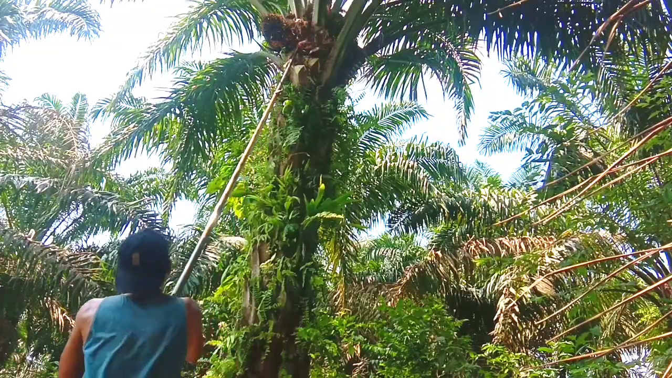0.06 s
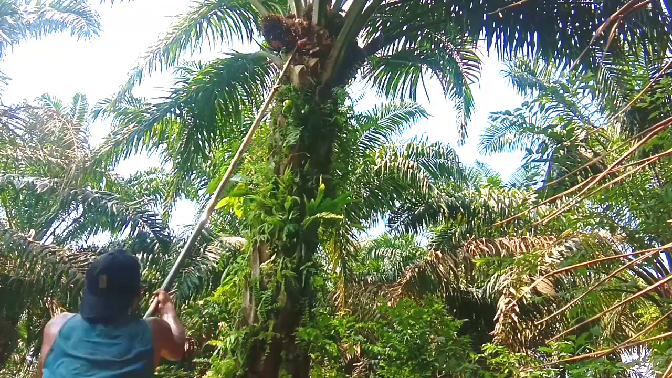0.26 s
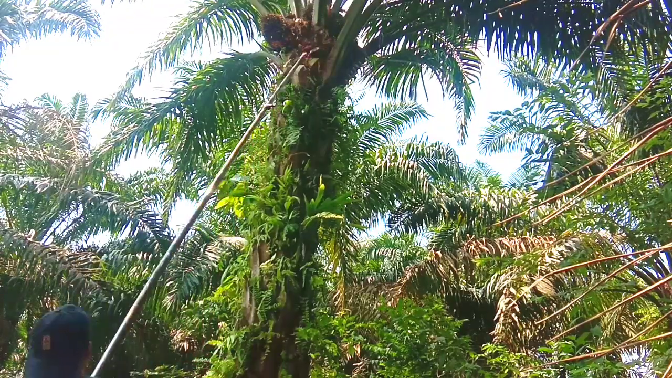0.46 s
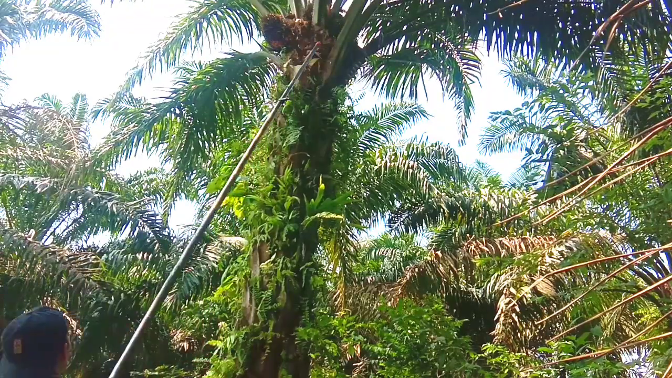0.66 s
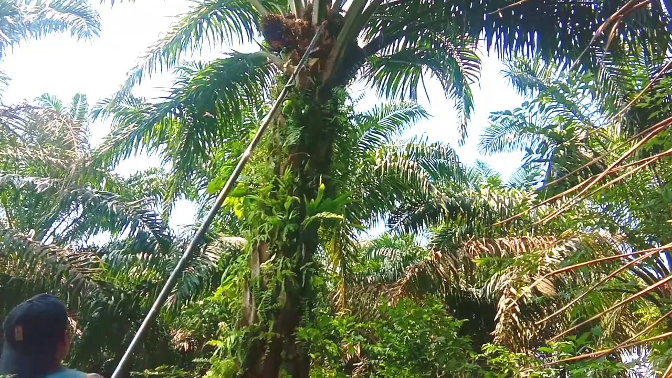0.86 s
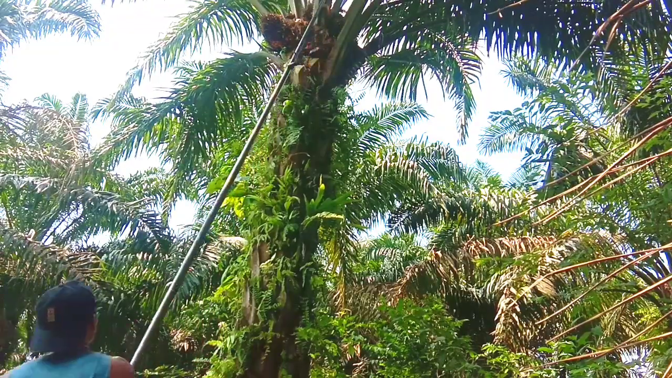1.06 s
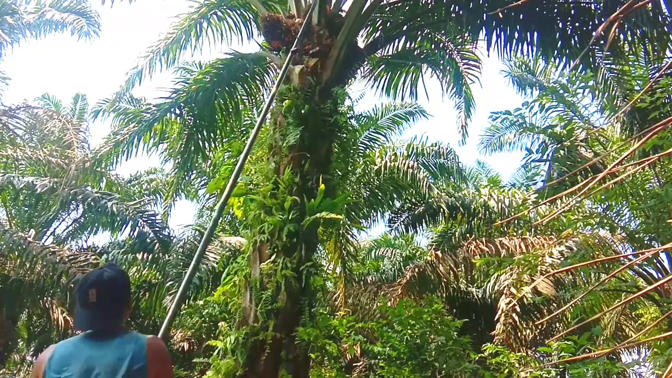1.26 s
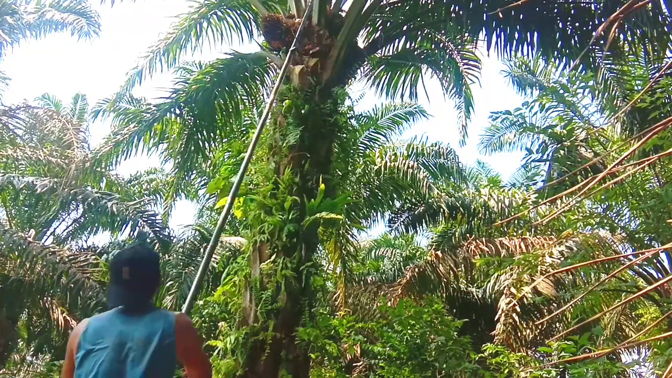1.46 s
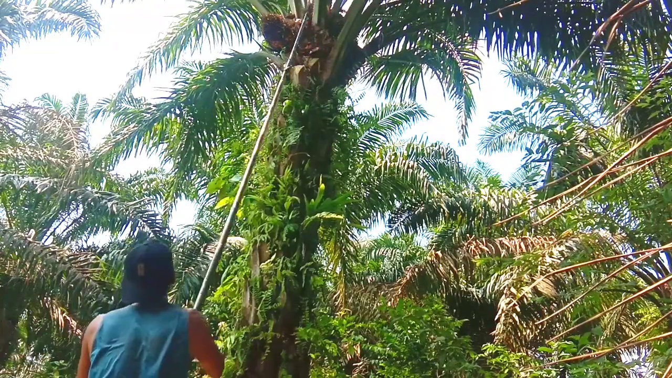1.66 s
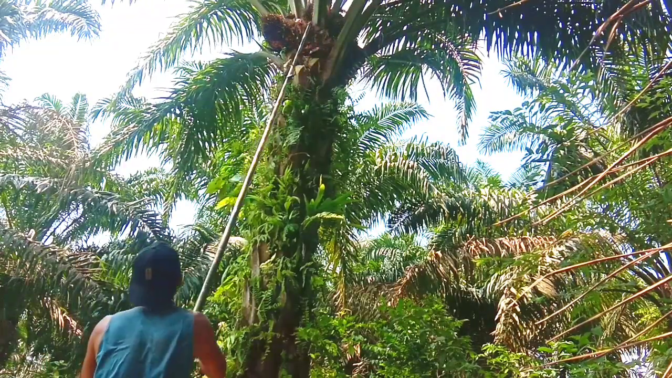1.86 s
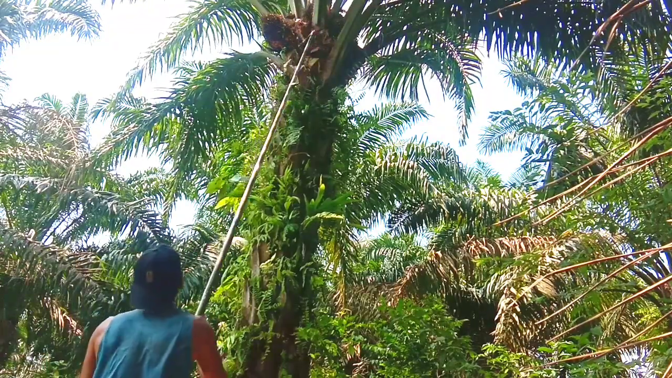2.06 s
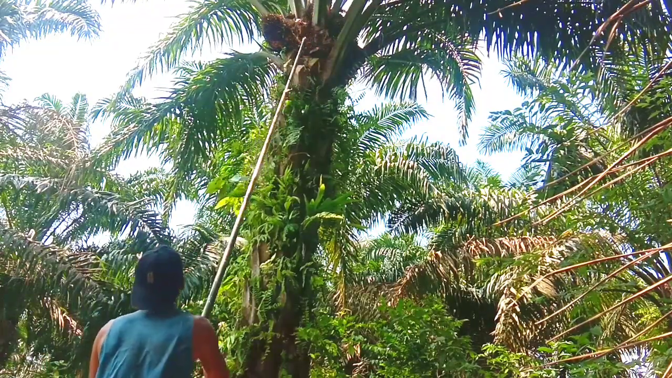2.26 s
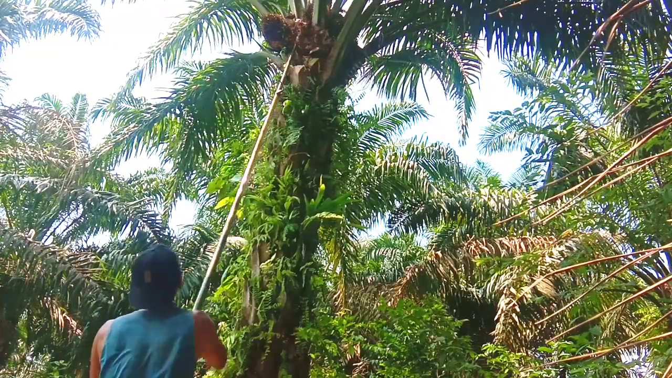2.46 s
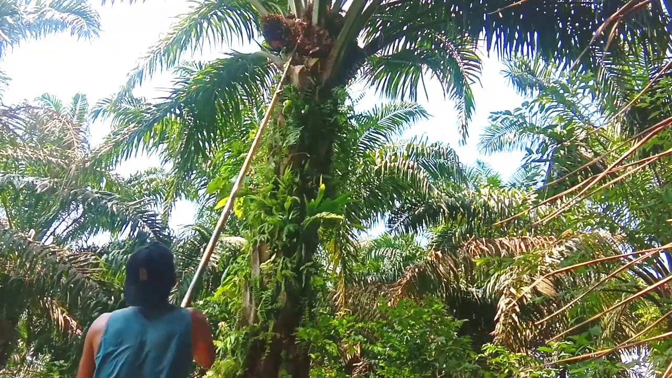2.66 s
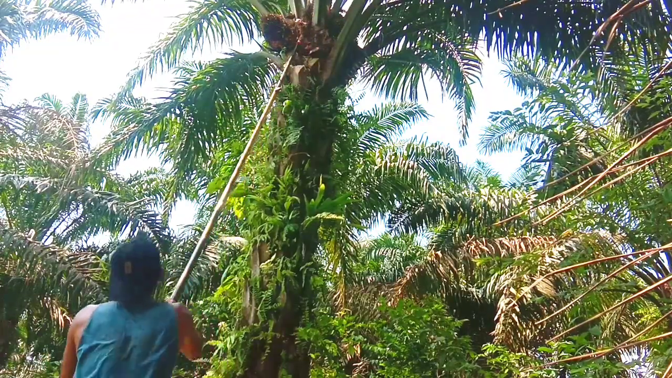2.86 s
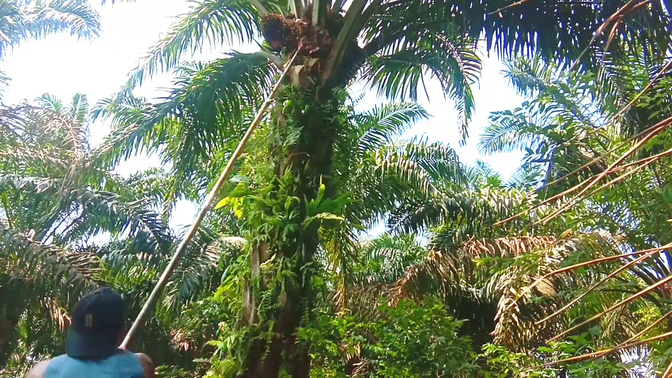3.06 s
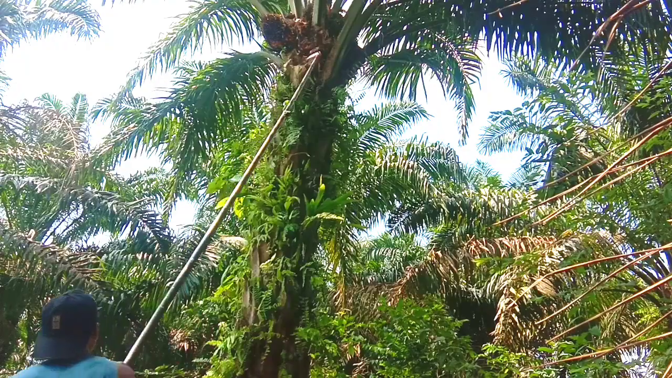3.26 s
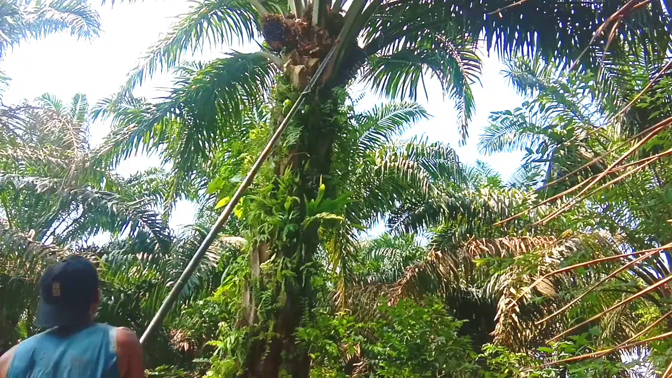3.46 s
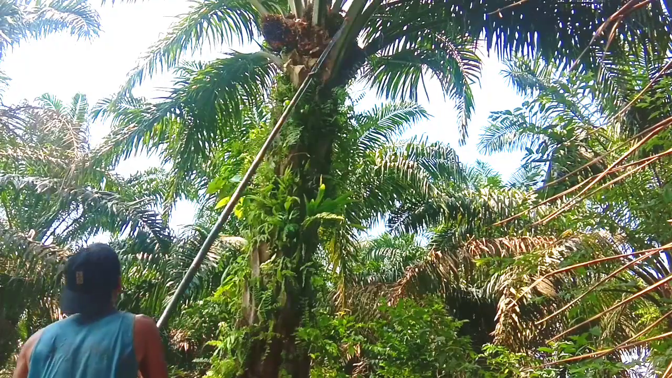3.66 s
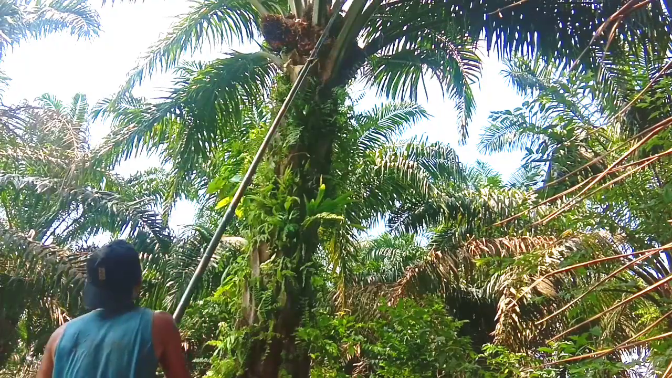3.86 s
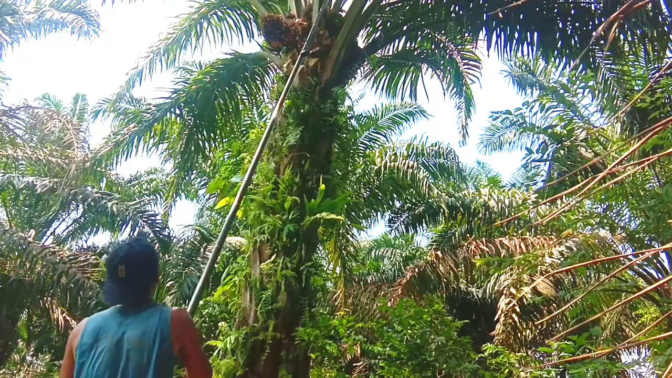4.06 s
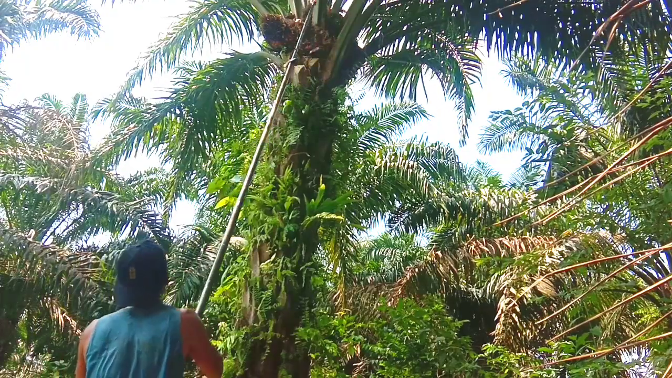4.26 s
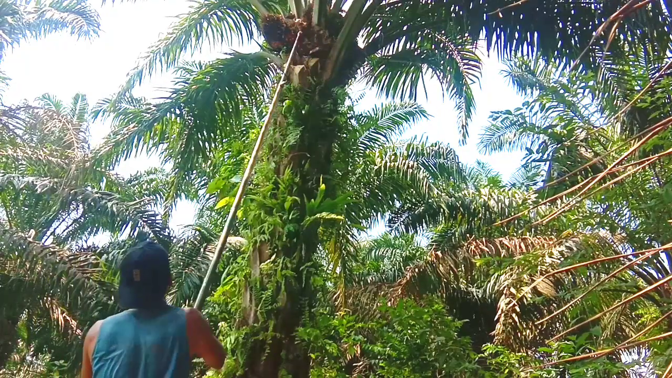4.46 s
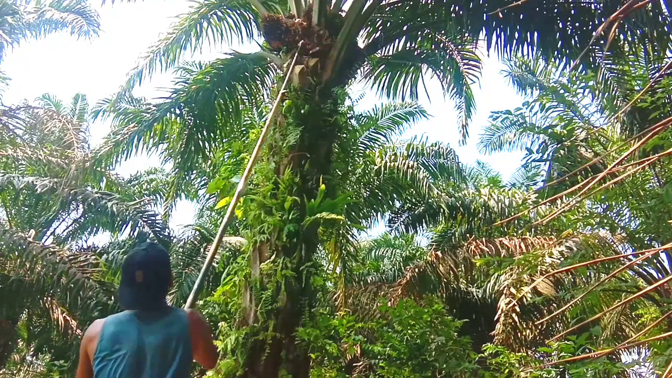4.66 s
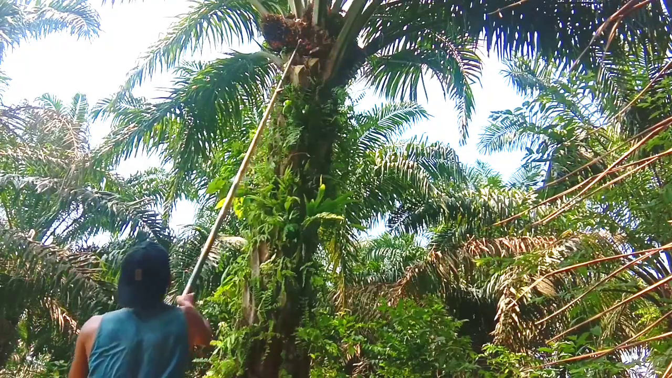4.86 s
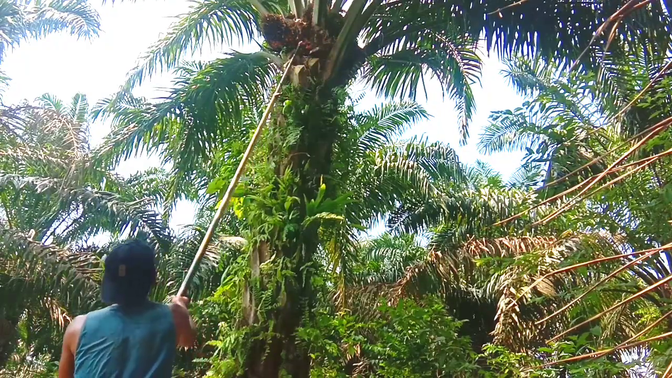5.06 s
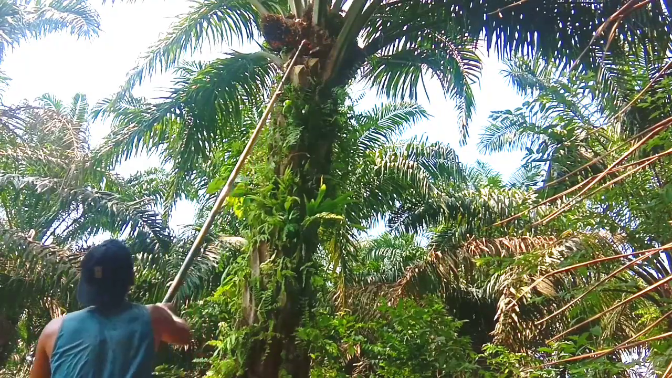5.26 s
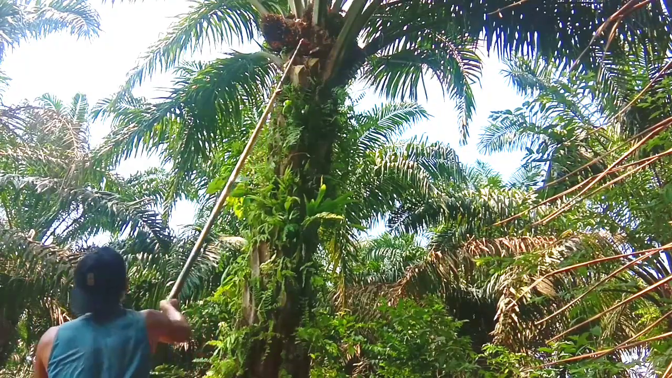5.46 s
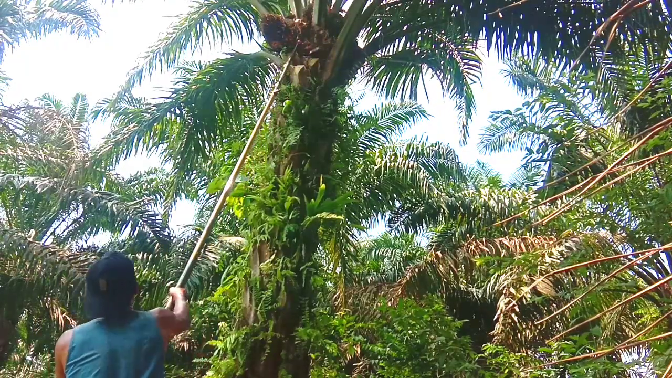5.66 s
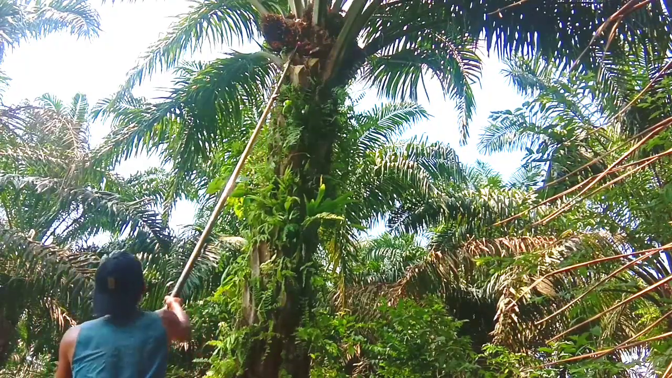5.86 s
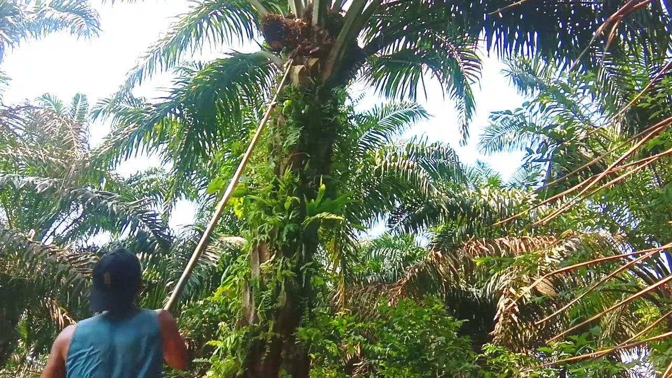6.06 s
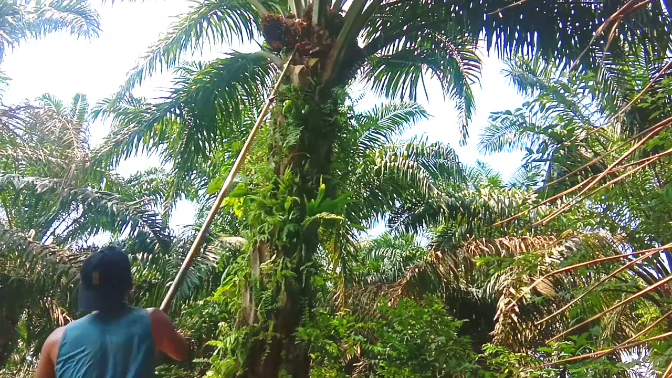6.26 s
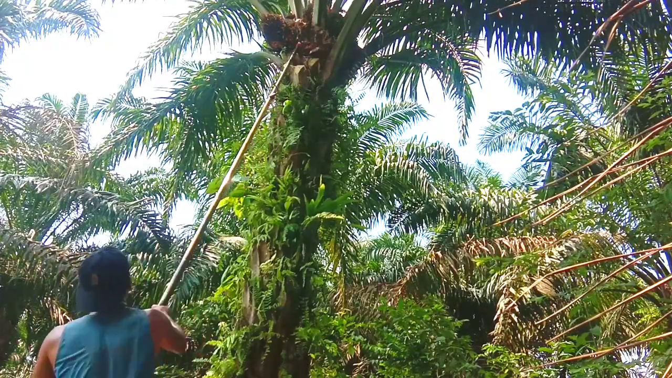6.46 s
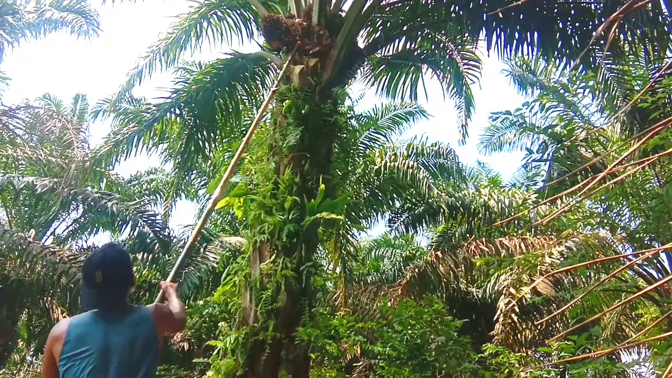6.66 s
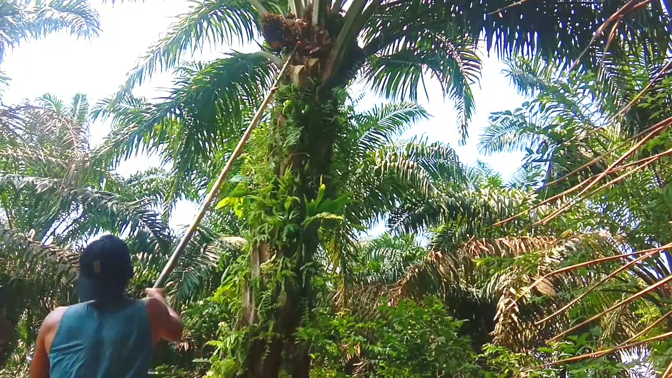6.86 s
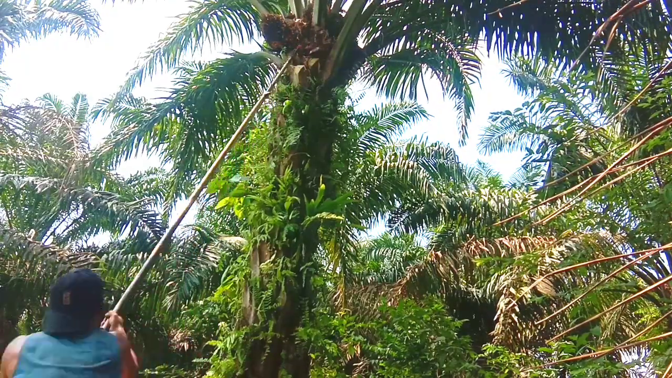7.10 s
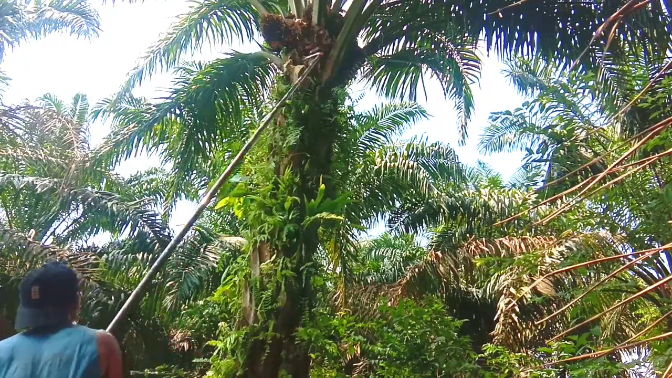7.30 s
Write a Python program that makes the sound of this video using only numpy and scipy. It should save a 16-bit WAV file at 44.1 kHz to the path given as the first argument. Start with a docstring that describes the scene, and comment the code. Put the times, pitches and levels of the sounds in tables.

```python
"""A sickle on a long hollow metal pole saws and scrapes at a palm's fruit stalk: stick and slip snaps fibres
in clumps and keeps pole and blade droning. Knocks excite the damped modes of the blade and shake dry fronds;
each jolt travels the pole as dispersive bending waves, a falling thump with echoes. Dry leaflets rustle in
ticks; far insects whine as clicks through narrow resonances, one nearer insect chirps three times; filtered
noise makes the quiet air. The sound is almost mono: only part of the air differs between the channels."""
import sys
import numpy as np
from scipy import signal
from scipy.fft import rfft, irfft, next_fast_len
from scipy.io import wavfile
from scipy.ndimage import uniform_filter1d

SR = 44100
rng = np.random.default_rng(int(sys.argv[2]) if len(sys.argv) > 2 else 0)


def bounce(signal):
    """Save signal as a 16-bit WAV file at the path given by the first command-line argument."""
    frames = np.transpose(np.atleast_2d(signal))
    limited = np.clip(frames, -1, 1)
    pcm = np.round(limited * 32767).astype(np.int16)
    wavfile.write(sys.argv[1], SR, pcm)


N = 323253

# Murmur of the air, spectral shape: [f/Hz, relative level/dB per Hz]
AIR_SPECTRUM = [(15, -31), (25, -22), (43, -6), (122, 5.5), (221, -3), (429, -4.5), (493, -8), (936, -13.5),
                (3090, -16.5), (6000, -23), (7800, -45), (13200, -120)]
# Air that differs between the channels, spectral shape: [f/Hz, relative level/dB per Hz]
WIDE_SPECTRUM = [(15, -40), (25, -8), (136, -3.5), (4380, -12.5), (6050, -15), (6550, -43), (8580, -54),
                 (9550, -30), (11500, -24), (15500, -26)]
AIR_DB, HISS_DB, WIDE_DB = -52, -53.5, -60
# Resonances of the insect chorus: [f/Hz, width/Hz, relative level/dB]
INSECT_BANDS = [(6765, 220, -8), (7167, 390, 0.5), (7366, 164, -2), (7730, 130, -9), (8390, 390, -6),
                (9190, 870, -10)]
# Course of the chorus: [t/s, level/dB]
CHORUS_LEVEL = [(0, -38.5), (.4, -38.5), (.8, -42), (1.16, -43), (1.43, -41), (3.1, -40.5), (3.5, -43),
                (4.7, -41.5), (6.04, -38), (6.35, -39.5), (7.33, -38)]
# Chirps of one nearer insect: [t/s, peak level/dB, f/Hz]
NEAR_CHIRPS = [(0.237, -25.5, 8460), (0.265, -34, 8330), (0.279, -29.5, 8340)]
# Dry fronds stirred by the pole, course: [t/s, level/dB]
RUSTLE_LEVEL = [(0, -49), (.2, -50), (.3, -43.5), (.8, -41), (.92, -66), (1.0, -46), (1.08, -71),
                (1.18, -52), (1.27, -40.5), (1.52, -40), (1.7, -47.5), (2.0, -47), (2.4, -45),
                (2.76, -44.5), (2.9, -50), (3.45, -48), (3.62, -77), (3.72, -47), (3.87, -45.5),
                (4.05, -46.5), (4.3, -57.5), (4.43, -47), (4.93, -56), (5.05, -40), (5.14, -50),
                (5.35, -47), (5.43, -52), (5.58, -45.5), (5.87, -52), (6.22, -41.5), (6.38, -69),
                (6.68, -46), (6.8, -59), (7.02, -47.5), (7.33, -48)]
# Dry leaflets, spectral shape: [f/Hz, relative level/dB per Hz]
LEAF_SPECTRUM = [(500, -4), (900, -6.5), (2000, -7.5), (4000, -4.5), (6000, -4.5), (8000, 4), (10000, -6.5),
                 (13000, -12), (16000, -5.5)]
# Jolts down the pole: [t/s, peak level/dB, strongest f/Hz, path along the pole/m]
JOLTS = [(.429, -18, 824, 27), (.444, -11, 400, 9), (0.521, -12, 277, 9), (0.55, -14, 375, 9),
         (1.182, -27, 273, 42), (1.22, -34.5, 164, 42), (1.71, -40.5, 487, 9), (1.759, -9.5, 547, 10.6),
         (1.766, -16, 225, 11.2), (1.81, -30.5, 142, 14), (2.178, -33.5, 423, 8.5),
         (2.458, -16.5, 480, 9.8), (2.635, -28, 890, 9.3), (3.022, -31.5, 152, 11.3), (3.164, -29, 844, 9),
         (3.214, -16, 256, 9), (3.27, -9, 296, 9), (3.312, -14, 355, 9), (3.768, -22, 286, 34),
         (3.802, -32.5, 156, 37), (3.835, -46, 130, 41), (4.463, -14, 695, 9.5), (4.465, -18, 235, 18),
         (4.556, -18.5, 452, 9), (4.645, -13, 318, 9), (4.72, -32.5, 434, 7), (4.985, -17, 304, 9),
         (5.214, -23, 231, 9.4), (5.387, -24, 284, 9), (5.539, -32, 312, 9), (5.638, -13.5, 490, 9),
         (5.684, -22.5, 392, 9), (5.948, -33, 460, 9.3), (6.152, -20, 295, 9), (6.242, -32, 310, 9),
         (6.507, -21.5, 693, 10.5), (6.578, -21.5, 470, 7.4), (6.63, -16.5, 287, 9), (6.825, -25, 268, 9),
         (7.044, -29.5, 235, 9), (7.262, -8.5, 830, 9.6)]
FAR_OCTAVES, NEAR_OCTAVES, NARROWING_M = 0.38, 1.21, 8.3  # a jolt loses bandwidth on its way
# Modes of the blade: [f/Hz, relative level/dB, t60/s]
BLADE_MODES = [(755, -0.5, 0.037), (859.5, -4.5, 0.069), (1035, -3, 0.053), (1308, -2, 0.03),
               (1490, -13, 0.052), (1610, -14, 0.15), (1780, -13.5, 0.12), (2253, -12.5, 0.093),
               (3370, 0, 0.079), (4740, -17, 0.096), (5360, 0, 0.11)]
# Steel meets wood: [t/s, clack level/dB, level/dB of the tick at nearly the same instant,
# low modes level/dB, favoured f/Hz, upper modes level/dB, favoured f/Hz];
# tick and modes are relative to the clack
BLOWS = [(.394, -11.5, -4, 1, 870, -8, 5000), (0.6268, -2.5, 5, -9.5, 865, -11, 1980),
         (.648, -12, -8, -5, 890, -17, 3430), (.779, -28, -11, 4, 1090, -11, 2250),
         (.806, -33, -10, 7, 870, -15, 3170), (.96, -39, 1, 1.5, 869, -6, 4530),
         (1.115, -33.5, -2, -1.5, 1130, -12, 4800), (1.4, -42, 22, -21, 900, -12, 5000),
         (1.477, -34, 9, -6, 703, -14, 4750), (1.529, -34, 13, -18, 1510, -16, 3570),
         (1.76, -8.5, -16, -4, 805, -2, 2250), (1.765, -9.5, -6, -10, 1027, -10, 2270),
         (2.086, -29, 9, 2, 1630, 9.5, 2100), (2.187, -47, 4, -13, 727, -10, 2360),
         (2.275, -10.5, -3, -9, 875, -16, 3080), (2.455, -24, 7, -2, 743, -3, 3590),
         (2.645, -22.5, -11, -5, 845, -11, 3930), (3.322, -2, -3, -11, 880, -7, 2180),
         (3.353, 0, -1, -12, 870, -16, 3760), (3.374, -9, -9, -34, 867, -4, 2250),
         (3.505, -25, -11, 1.5, 980, -13, 1960), (3.64, -43.5, -8, 7, 855, -8, 2500),
         (4.466, -15, -17, -1, 732, 1, 2140), (4.557, -14, -11, -2, 732, 3, 2260),
         (4.767, -22.5, 1, 0.5, 1090, -12, 3330), (4.963, -44, 8, -22, 738, 1, 3400),
         (4.985, -27.5, -9, 3, 930, -7, 2170), (5.041, -35, 9, -15, 1440, -6, 3250),
         (5.475, -39, 16, 1, 966, -4, 5550), (5.643, -10, 0, -9, 1110, 1, 2450),
         (6.145, -19.5, -10, -22, 1310, -8, 3340), (6.513, -23, -10, -6, 738, 0, 2100),
         (6.582, -28, 11, -13, 721, -2, 2420), (6.824, -34.5, -8, 5, 754, -10, 2250),
         (7.272, -7.5, -8, -6, 743, -2.5, 5500), (7.3, -4, -11, -11, 872, -12, 4820)]
FRONDS_DB, FRONDS_T60_S = -21, 0.091  # shaken fronds, level relative to the clack
# Snapping fibres and shaken fronds, spectral shape: [f/Hz, relative level/dB per Hz]
CRACKLE_SPECTRUM = [(710, 0), (1200, -10.5), (1320, -11), (1790, -2), (2560, -2.5), (2830, -1), (4000, -2),
                    (4650, 1), (5840, 0.5), (7740, 5.5), (10100, -7.5), (14800, -14), (16000, -5)]
CRACKLE_PER_S, CRACKLE_SPREAD_DB = 9000, 1.5
# Resonances of the hollow pole: [f/Hz, width/Hz, relative level/dB]
POLE_MODES = [(82, 20, -14), (140, 78, -5), (238.5, 42, -3.5), (283, 108, 1), (418.5, 42, 4),
              (518.4, 70, 2.5)]
# Three hard pulls through the stalk, one list each:
# [t/s, crackle level/dB, pole drone level/dB, rasp level/dB], the last two relative to the crackle
HARD_PULLS = [
    [(0.33, -46, 1, -8), (0.4, -27, 1, 11), (0.424, -13.5, 2.5, -3.5), (0.5, -20.5, -2.5, 0),
     (0.556, -17, 3.5, 4.5), (0.586, -24, -8, -15), (0.618, -31.5, -5, -3), (0.626, -30, -6, -3),
     (0.64, -27, 1, -1), (0.658, -27, -6, 6.5), (0.7, -36, -12, -4), (0.74, -40.5, 9, 4.5),
     (0.76, -41, -3, -6)],
    [(3.04, -57.5, 11, 8.5), (3.098, -24, 8.5, 1), (3.12, -35.5, -6, 14.5), (3.128, -24, 3, 5.5),
     (3.168, -16.5, 0.5, 0), (3.188, -16, 2, -11), (3.2, -23.5, 2, 3.5), (3.272, -16, -2.5, -2),
     (3.342, -28.5, -7, -4), (3.356, -26.5, -13, 6.5), (3.412, -34, -27, -5), (3.46, -43, -23, -19),
     (3.49, -44, -23, -6)],
    [(7.08, -52.5, 5, 6.5), (7.128, -45.5, 13.5, 5), (7.188, -18.5, 1.5, 5), (7.21, -17, 3, 0),
     (7.218, -12.5, -4, -1.5), (7.254, -21, 4.5, -2), (7.264, -19, 11.5, 4), (7.276, -17.5, 6, 0.5),
     (7.33, -23, 0, 1)],
]
# Lighter scrapes: [t at full strength/s, swell/s, hold/s, crackle level/dB, pole drone level/dB,
# rasp level/dB], the last two relative to the crackle
LIGHT_SCRAPES = [(.785, 0.02, 0.034, -53, 11.5, 17), (.989, .03, 0, -54, -8, 5),
                 (1.113, .01, 0.13, -60, 3, 10), (1.398, 0.024, 0, -46, 5.5, -22),
                 (1.53, .002, 0, -34, -31, -32), (1.773, 0.022, 0.0095, -26, -3, -1),
                 (2.097, 0.079, 0, -34.5, -5.5, -2), (2.185, 0.011, 0, -46.5, 5, 2),
                 (2.285, 0.045, 0, -32.5, 1.5, 2), (2.463, 0.026, 0.079, -32.5, 3.5, 4),
                 (2.64, 0.012, 0, -42.5, 6, -1), (2.791, 0.052, 0, -43, -24, -25),
                 (2.962, 0.04, 0.042, -47, -3, -17), (3.51, .01, 0.023, -58, 16.5, 20),
                 (3.701, .002, 0, -53, -20, -18), (4.35, .012, 0, -44.5, -18, -20),
                 (4.473, 0.02, 0, -29, 6, 5.5), (4.563, 0.01, 0.0061, -24.5, 2.5, -4),
                 (4.663, 0.058, 0.041, -47, 11, 11), (4.775, 0.013, 0, -33.5, -4, -1.5),
                 (4.998, 0.038, 0, -53, 26.5, 14), (5.19, 0.048, 0.054, -46.5, 11, 12.5),
                 (5.25, 0.085, 0.047, -32, 3.5, 1), (5.389, .01, 0, -58, 23, 11),
                 (5.486, 0.053, 0.028, -43, -1, -4), (5.648, 0.015, 0, -18.5, -8, -3.5),
                 (5.686, 0.01, 0.042, -34, 12, 7), (5.8, .04, 0.024, -56, 15, 1),
                 (5.9, 0.037, 0.051, -50, 9, 7), (5.953, 0.013, 0.054, -41.5, 10.5, 4),
                 (6.053, 0.084, 0.092, -32.5, 6, 6), (6.242, 0.011, 0, -52, -6, 6),
                 (6.518, 0.068, 0, -37, 5.5, 3), (6.588, 0.028, 0.044, -34, 6, 3),
                 (6.839, 0.029, 0, -55, 26.5, 18)]
SWELL_DB = 25  # rise of a lighter scrape over its swell time
PULL_RING_DB, SCRAPE_RING_DB = -5.5, -12.5  # blade drone against rasp: hard pulls set it ringing more
# Slope outside a pull and after a scrape [dB/s]: crackle, pole drone, rasp, blade drone
SLOPES_DB_PER_S = [225, 244, 230, 204]
EDGE_HZ = 15600  # upper band limit


def amp(db):
    """Logarithmic level: 20 dB is a factor of ten in amplitude."""
    return 10 ** (np.asarray(db) / 20)


def evened(x):
    """Normalisation of power: scales to rms 1."""
    return x / np.sqrt(np.mean(x ** 2) + 1e-20)


def read(points, hz):
    """Interpolation of a spectrum over logarithmic frequency."""
    f, value = np.transpose(points)
    return np.interp(np.log(hz + 1), np.log(f + 1), value)


def curve(table):
    """Linear interpolation in time: columns of a table at every sample."""
    s, *columns = np.transpose(table)
    t = np.arange(N) / SR
    return np.array([np.interp(t, s, column) for column in columns])


def add(mix, s, sound):
    """Superposition: adds a sound to the mix from s seconds on."""
    part = mix[round(s * SR):][:len(sound)]
    part += sound[:len(part)]


def coloured(x, points):
    """Linear filtering: multiplies the spectrum by a curve in dB."""
    size = next_fast_len(len(x))
    gain = amp(read(points, np.fft.rfftfreq(size, 1 / SR)))
    return irfft(rfft(x, size) * gain, size)[:len(x)]


def above(x, hz):
    """Steep high-pass: attenuates what lies below hz."""
    return signal.sosfilt(signal.butter(4, hz, "high", fs=SR, output="sos"), x)


def resonate(x, hz, width):
    """Resonance: two equal peak filters in series, gain 1 at the centre."""
    b, a = signal.iirpeak(hz, hz / width, SR)
    return signal.lfilter(b, a, signal.lfilter(b, a, x))


def snaps(per_s, spread_db):
    """Random impulses of either sign: most small, a few large."""
    size_db = spread_db * np.minimum(rng.exponential(1, N), 5)
    size = amp(size_db) * rng.choice([-1., 1.], N)
    return evened(size * (rng.random(N) < per_s / SR))


def wander(span):
    """Smoothed noise: a slow fluctuation of rms 1 that changes within span seconds."""
    size = max(int(span * SR), 2)
    return evened(uniform_filter1d(uniform_filter1d(rng.standard_normal(N), size), size))


def catches(per_s, fade_s):
    """Relaxation: the edge catches suddenly and lets go gradually, a saw-toothed chance of rms 1."""
    kicks = rng.exponential(1, N) * (rng.random(N) < per_s / SR)
    teeth = signal.lfilter([1], [1, -np.exp(-1 / (max(fade_s, .001) * SR))], kicks)
    return evened(teeth - teeth.mean())


def shifting(x, depth_db):
    """Random modulation in time and frequency: narrow bands come and go; rms 1."""
    z = signal.stft(x, nperseg=1024, noverlap=768)[2]
    patches = rng.standard_normal(z.shape[::-1])
    patches = uniform_filter1d(uniform_filter1d(patches, size=12, axis=0), size=2, axis=1)
    z = z * amp(depth_db * evened(patches).T)
    return evened(signal.istft(z, nperseg=1024, noverlap=768)[1][:len(x)])


def air():
    """Broadband noise: a low murmur of breeze and distance that swells a little, and a thin high hiss."""
    murmur = shifting(coloured(rng.standard_normal(N), AIR_SPECTRUM), depth_db=1.2)
    murmur = murmur * amp(AIR_DB + 2.0 * wander(0.073))
    hiss_spectrum = [(6000, -30), (9000, -5.0), (12500, -2.0), (15000, 9.0)]  # f/Hz, level/dB
    hiss = coloured(rng.standard_normal(N), hiss_spectrum)
    return murmur + amp(HISS_DB) * shifting(hiss, depth_db=1.7)


def wide_air():
    """Antiphase noise: the part of the air by which the channels differ."""
    return amp(WIDE_DB) * evened(coloured(rng.standard_normal(N), WIDE_SPECTRUM))


def grove(x):
    """Multiple scattering: trunks and fronds return a short, sparse tail."""
    t = np.arange(SR // 3) / SR
    taps = rng.choice([-1., 1.], len(t)) * (rng.random(len(t)) < .05)
    taps = taps * amp(-60 * t / 0.26) * (t > .008)  # t60 0.26 s, first returns after 8 ms
    return signal.oaconvolve(x, taps / np.linalg.norm(taps))[:N]


def insects():
    """Excited resonance: many far wings click into a few narrow bands; a near insect chirps, falling."""
    clicks = snaps(12000, 2.0) * amp(0.32 * wander(0.0047))
    song = sum(amp(db) * evened(resonate(clicks, hz, width)) for hz, width, db in INSECT_BANDS)
    out = amp(curve(CHORUS_LEVEL)[0] + 0.16 * wander(0.031)) * evened(song)
    t = np.arange(400) / SR
    for s, db, hz in NEAR_CHIRPS:
        tone = np.sin(2 * np.pi * hz * (1.013 * t - 1.9 * t ** 2))
        add(out, s, amp(db) * np.hanning(len(t)) * tone)
    return out


def rustle():
    """Random impacts and friction: dry leaflets tick and brush in small uneven clumps."""
    ticks = shifting(coloured(snaps(4000, 2.1), LEAF_SPECTRUM), depth_db=3.5)
    return above(amp(curve(RUSTLE_LEVEL)[0] + 2.4 * wander(0.022)) * ticks, 290)


def thumps():
    """Dispersion: high bending waves run faster, so a jolt arrives as a falling note, then its end echoes."""
    out, size, lead = np.zeros(N), 16384, .03  # lead in s leaves room for early arrivals
    hz, t = np.fft.rfftfreq(size, 1 / SR), np.arange(1500) / SR
    chatter = rng.standard_normal((len(JOLTS), len(t))) * amp(-60 * t / .045)  # edge on the fibres
    for (s, db, top_hz, metres), contact in zip(JOLTS, chatter):
        contact = np.r_[1, contact[1:] * 2.4 / max(metres, 1)]  # chatter fades on a long way
        octaves = FAR_OCTAVES + (NEAR_OCTAVES - FAR_OCTAVES) * np.exp(-max(metres, 0) / NARROWING_M)
        band = np.exp(-(np.log2((hz + 1) / top_hz) / max(octaves, .15)) ** 2)
        travel = max(metres, 0) / 39  # group speed in the metal tube is 39 sqrt(f/Hz) m/s
        arrival = travel / np.sqrt(1.368 * top_hz)  # taken off, so this frequency lands at s
        spread = 2 * travel * np.sqrt(hz) - arrival * hz  # phase in cycles
        echo_db = -8.5 - 0.4 * metres
        paths = 0
        for k in range(4):  # direct wave and three echoes
            cycles = (1 + 0.65 * k) * spread + (lead + 0.023 * k) * hz
            paths = paths + amp(echo_db * k) * np.exp(-2j * np.pi * cycles)
        wave = irfft(band * paths * rfft(contact, size), size)[:size // 2]
        add(out, s - lead, amp(db) * wave / abs(wave).max())
    return out


def blade_ring(shades_db):
    """Modal decay: the blade after a blow is a sum of damped sines, some favoured."""
    t = np.arange(SR // 4) / SR
    return sum(amp(db + shade - 60 * t / t60) * np.sin(2 * np.pi * hz * t)
               for (hz, db, t60), shade in zip(BLADE_MODES, shades_db))


def knocks():
    """Impact excitation: a woody clack and a steel tick, blade modes and a burst of shaken fronds."""
    out, t = np.zeros(N), np.arange(SR // 4) / SR
    modes_hz = np.transpose(BLADE_MODES)[0]
    chance_db = 1.5 * rng.standard_normal((len(BLOWS), len(BLADE_MODES)))
    fronds = evened(coloured(rng.standard_normal(N + len(t)), CRACKLE_SPECTRUM))
    clack = np.sin(2 * np.pi * 1350 * t) * np.exp(-((t - .0007) / 0.00036) ** 2)
    tick = np.sin(2 * np.pi * 6500 * t) * np.exp(-((t - .0005) / 0.00015) ** 2)
    swelling = 1 - np.exp(-t / 0.0023)  # ring and fronds build up after the contact
    for (s, db, tick_db, ring_db, low_hz, upper_db, upper_hz), shade_db in zip(BLOWS, chance_db):
        low_db = ring_db + 3.0 - 18 * abs(np.log2(modes_hz / low_hz))
        high_db = upper_db - 30 * abs(np.log2(modes_hz / upper_hz))
        ring = blade_ring(shade_db + np.where(modes_hz < 2000, low_db, high_db))
        shake = amp(FRONDS_DB - 60 * t / FRONDS_T60_S) * fronds[round(s * SR):][:len(t)]
        add(out, s, amp(db) * (clack + amp(tick_db) * tick + swelling * (ring + shake)))
    return above(out, 293)


def effort():
    """Superposed strokes: gains of crackle, pole drone, rasp and blade drone over all pulls and scrapes."""
    t, gains = np.arange(N) / SR, np.zeros((len(SLOPES_DB_PER_S), N))
    slopes = np.c_[SLOPES_DB_PER_S]
    for table in HARD_PULLS:
        db, pole_db, rasp_db = curve(table)
        outside = np.maximum(np.maximum(table[0][0] - t, t - table[-1][0]), 0)  # s before or after
        layers_db = np.array([0 * db, pole_db, rasp_db, rasp_db + PULL_RING_DB])
        gains += amp(db - slopes * outside + layers_db)
    for s, swell, hold, db, pole_db, rasp_db in LIGHT_SCRAPES:
        at = slice(max(round((s - .4) * SR), 0), round((s + .6) * SR))
        since = t[at] - s
        rise_db = np.minimum(SWELL_DB * since / max(swell, .001), 0)
        fall_db = slopes * np.maximum(since - max(hold, 0), 0)
        layers_db = np.c_[[0, pole_db, rasp_db, rasp_db + SCRAPE_RING_DB]]
        gains[:, at] += amp(db + rise_db - fall_db + layers_db)
    return gains


def scrape():
    """Stick and slip: fibres snap under the edge in clumps while pole and blade are kept droning."""
    strokes = effort() * amp(1.51 * catches(110, fade_s=.012))
    crackle_gain, pole_gain, rasp_gain, ring_gain = strokes
    crackle = coloured(snaps(CRACKLE_PER_S, CRACKLE_SPREAD_DB), CRACKLE_SPECTRUM)
    thick_fibres = evened(coloured(snaps(120, 1.34), CRACKLE_SPECTRUM))  # these break singly
    crackle = shifting(crackle, depth_db=4.0) + amp(-11) * thick_fibres
    slips = snaps(900, 3.8) * amp(1.9 * wander(0.0063))
    pole = sum(amp(db) * evened(resonate(slips, hz, width)) for hz, width, db in POLE_MODES)
    bites = snaps(1200, 0.83)
    b, a = signal.butter(N=2, Wn=[600, 1600], btype="band", fs=SR)
    rasp = shifting(signal.lfilter(b, a, bites + 1.54 * snaps(4000, 4.7)), depth_db=5.5)
    shades_db = -30 * abs(np.log2(np.transpose(BLADE_MODES)[0] / 867))  # modes near 867 Hz favoured
    ring = evened(signal.oaconvolve(bites, blade_ring(shades_db))[:N])
    bright = amp(3.0) * crackle_gain * crackle
    bright = bright + amp(-5.0) * rasp_gain * rasp + ring_gain * ring
    return above(bright, 462) + above(amp(-5.5) * pole_gain * evened(pole), 33)


def scene():
    """Mid and side: work and insects reach both channels alike; only the air is wide."""
    blows = knocks() + thumps()
    mid = scrape() + rustle() + blows + amp(-12.0) * grove(blows) + insects() + air()
    side = wide_air()
    return np.array([mid + side, mid - side])


def record(dry):
    """Clipping and band limitation: peaks beyond full scale are cut, then a low-pass follows."""
    clipped = np.clip(dry, -1, 1)
    low_pass = signal.firwin(511, EDGE_HZ, window=("kaiser", 9), fs=SR)
    return signal.oaconvolve(clipped, low_pass[None], "same")


dry = scene()
out = record(dry)
bounce(out)
```